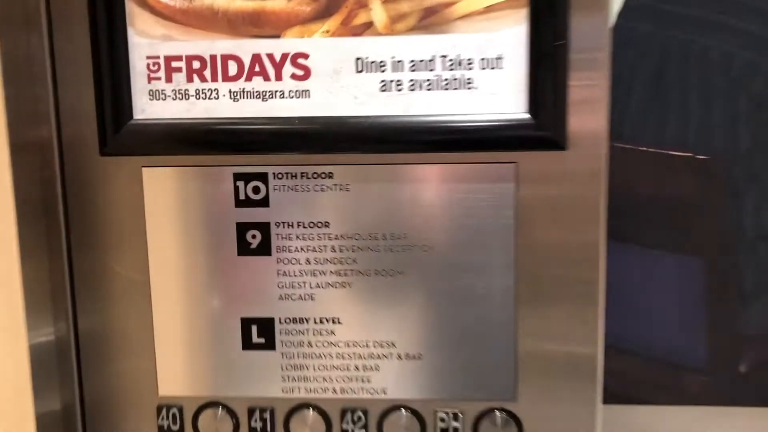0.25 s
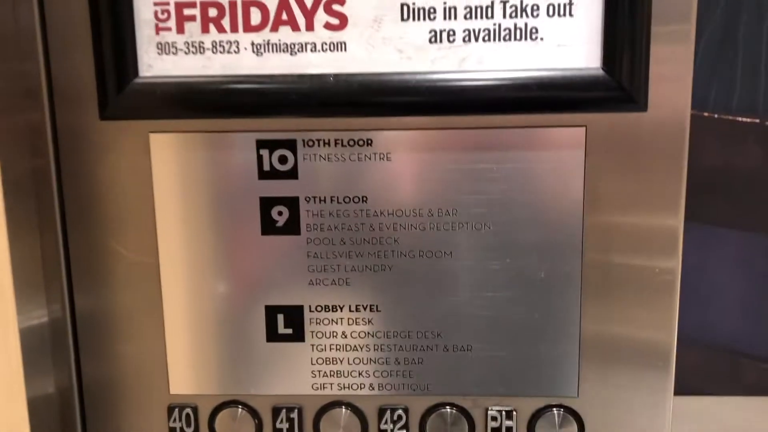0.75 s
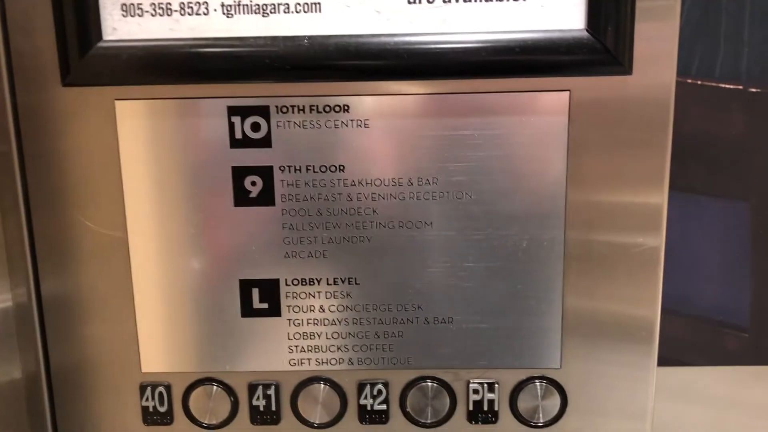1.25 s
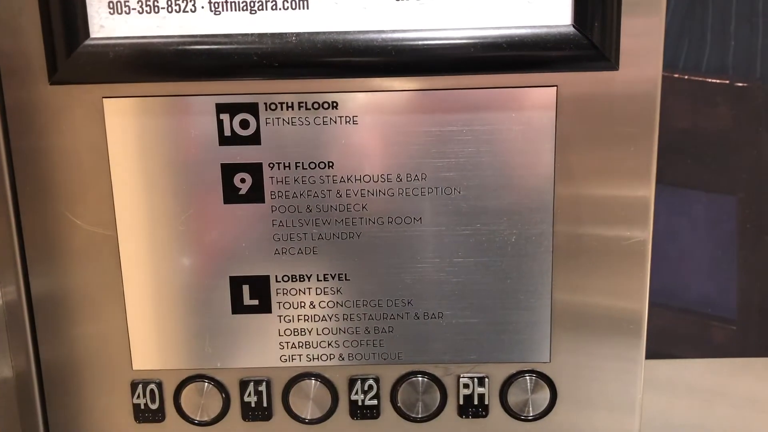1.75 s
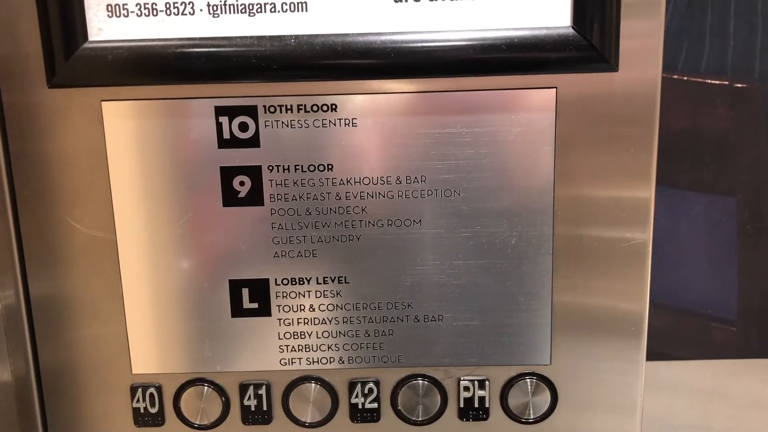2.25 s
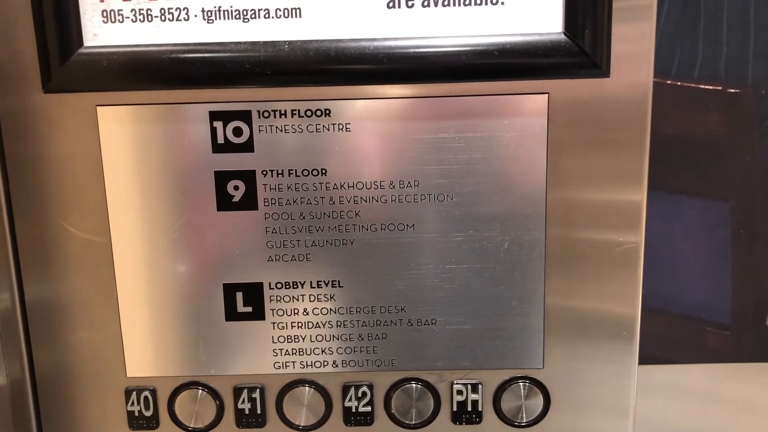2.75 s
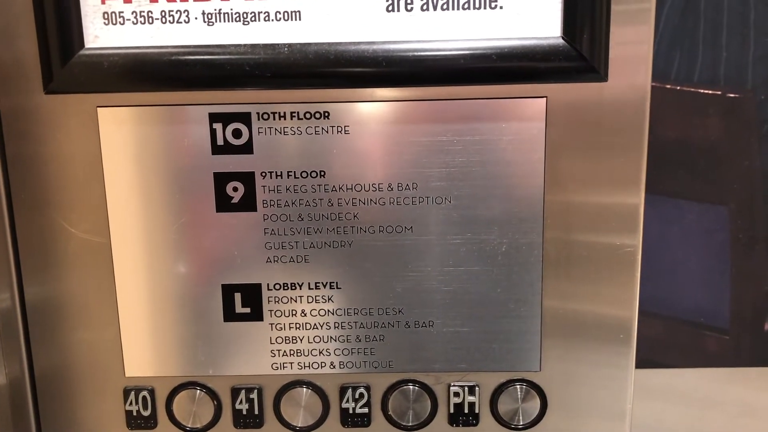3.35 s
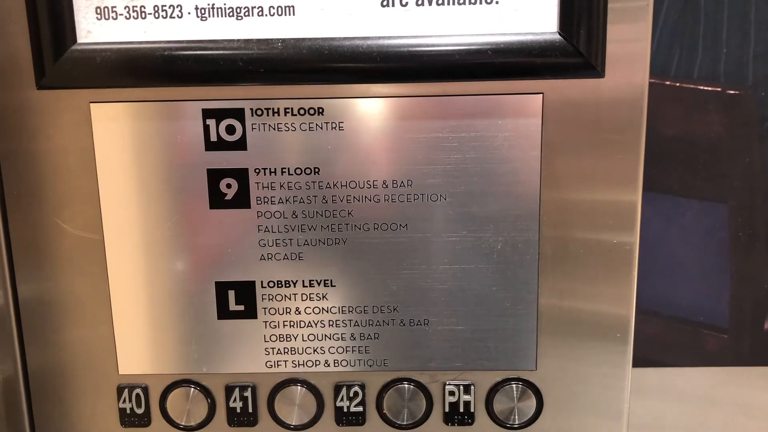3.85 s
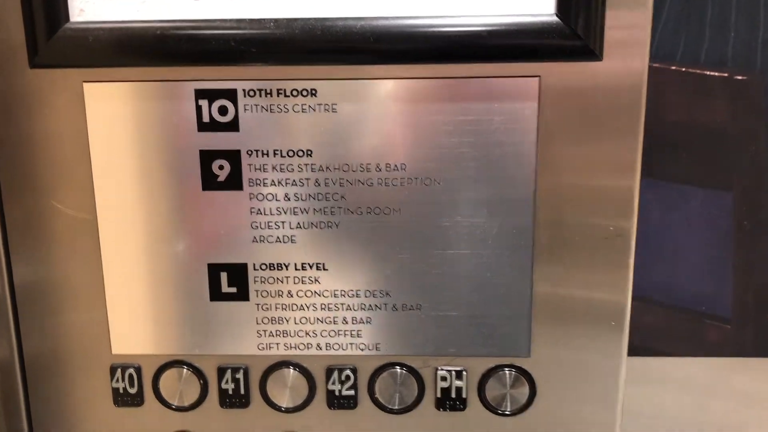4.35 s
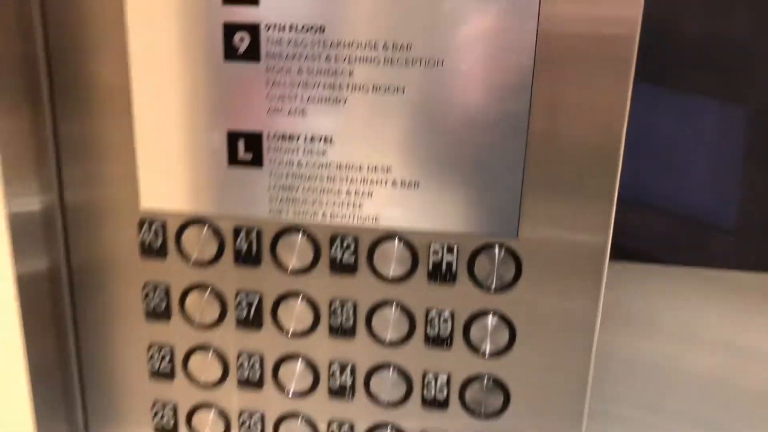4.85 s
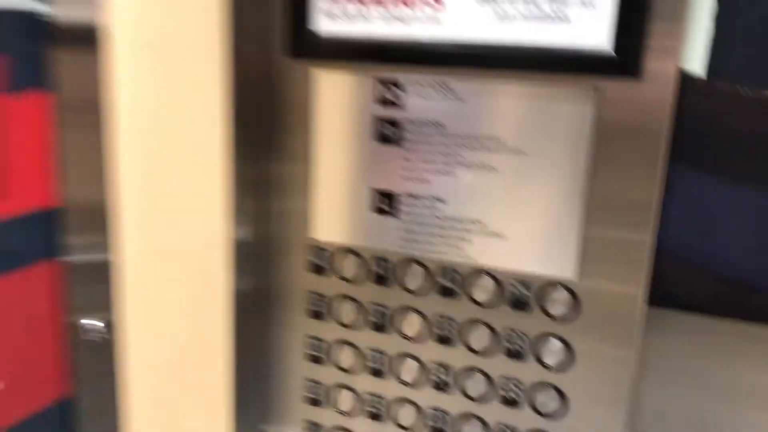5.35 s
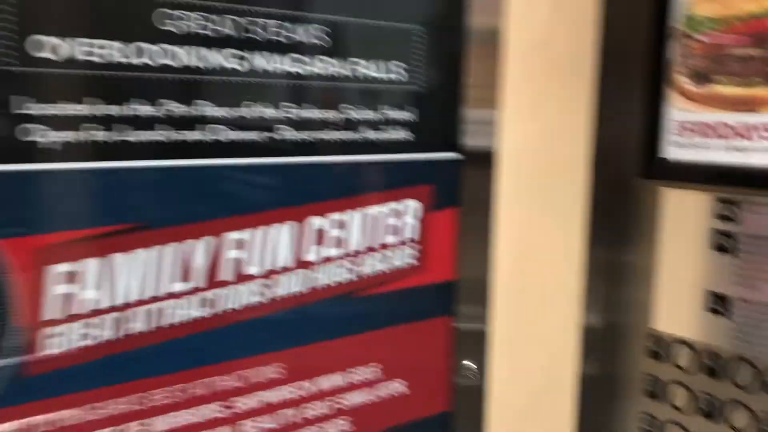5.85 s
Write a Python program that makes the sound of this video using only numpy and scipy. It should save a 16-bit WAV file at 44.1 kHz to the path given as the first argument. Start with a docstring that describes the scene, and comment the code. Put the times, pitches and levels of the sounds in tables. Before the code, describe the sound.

Inside a moving elevator cab, a steady low motor hum and uneven rumbling drone sit under soft fan air, with faint handling rustles and ticks.

```python
"""Travelling elevator cab.

A ceiling fan hums at twice the mains frequency (sine) and blows air (shaped noise, lifted at the cab's
standing waves). Low tones at multiples of a roller's turn rate, about four per second, and an uneven
drone (wavering sine) sound over panel rumble (noise). A hand shifting on the recorder adds faint treble
rustles (grainy noise strokes) and ticks (noise snaps with decaying modes)."""
import sys
import numpy as np
from scipy import signal
from scipy.fft import rfft, irfft
from scipy.io import wavfile
from scipy.ndimage import uniform_filter1d

SR = 44100
rng = np.random.default_rng(int(sys.argv[2]) if len(sys.argv) > 2 else 0)


def output_pcm(signal):
    """Save a mono or channel-first signal as 16-bit PCM at the path in sys.argv[1].

    Samples are clipped to [-1, 1] before scaling.
    """
    pcm = np.clip(np.atleast_2d(signal).T, -1, 1) * 32767
    wavfile.write(sys.argv[1], SR, np.round(pcm).astype(np.int16))


N = 268524

# panel rumble density before lifts and level changes: freq_hz, density_db_per_hz
RUMBLE_DENSITY = [(15, -100), (30, -83.5), (45, -69), (58, -60.5), (68, -61.5), (80, -57), (90, -61),
                  (99, -49), (108, -52), (118, -66), (134, -59), (150, -53.5), (162, -55.5), (170, -63.5),
                  (183, -60), (194, -64), (222, -64), (250, -68.5), (300, -68), (450, -92)]
# fan air density before lifts and level changes: freq_hz, density_db_per_hz
AIR_DENSITY = [(200, -80), (400, -76), (600, -80), (800, -81), (1200, -83), (1450, -86), (1900, -89.5),
               (2050, -92), (2600, -92), (3000, -94), (5000, -103), (7500, -108), (10000, -115),
               (13000, -121), (16000, -125)]
# cab standing waves: freq_hz, width_hz, lift_db
CAB_MODES = [(200, 12, 3.5), (237, 20, 6), (260, 12, 3.5), (277.4, 16, 5.5), (344.8, 31, 5.5),
             (367, 8.5, 1.5), (447, 16, 2), (500.7, 24.4, 7), (555.5, 30, 7), (636, 19, 5.5), (681, 21, 4),
             (894, 6, 6), (1671, 18, 7)]
# slow level changes of hum, rumble and air:
# time_s, hum_db_rms, rumble_db, air_db, air_treble_db, mode_pair_share (two modes near 500 Hz)
SLOW_LEVELS = [(0, -36.5, -3, 0.5, 0, 0.64), (.6, -33.5, -2, 0.5, -0.5, 1.1),
               (1.5, -34.5, -1, -1, -1.5, 1.05), (2.1, -36, -2, 0, -0.5, 1.7),
               (2.7, -32.5, 0.5, -0.5, -2.3, 1.5), (3.4, -36, -1, 0.2, -1.9, 1.2),
               (4, -34, -1.5, -0.55, -1.5, 1.06), (4.7, -33.5, -2, -1, -1.5, 1.3),
               (5.3, -34.5, -0.5, 0.4, -0.3, 0.25), (5.7, -37, -5.5, -0.8, -2, 1.3),
               (6.09, -38.5, -6.5, 1.5, 1, 0.45)]
# deepest rumble: time_s, gain_db
DEEP_GAIN = [(0, 2.5), (1.2, -7), (2, -1.5), (3.6, -4.5), (4.6, -5.5), (5.4, 0), (6.09, 8)]
# borders of the separately swelling rumble bands: freq_hz
SWELL_BORDERS_HZ = [130, 200, 260, 350]
# grip ticks: time_s, nominal_peak_db, centre_hz, spread_octaves
GRIP_TICKS = [(0.2992, -60, 11000, .6), (0.5816, -56, 8500, .3), (0.5874, -58, 13000, .35),
              (1.057, -57, 13500, .35), (2.2737, -63, 8200, .4), (2.2835, -64, 8000, .4),
              (2.3655, -64, 8500, .3), (2.378, -65, 8500, .4), (5.4226, -56, 7000, .35),
              (5.4231, -61, 13500, .3), (5.509, -61, 8000, .5), (5.5189, -58, 8500, .5),
              (5.6614, -58, 8500, .9), (5.672, -54, 9800, .7), (5.7543, -59, 9000, .9),
              (5.8137, -56, 7900, 0.11), (5.9294, -61, 14000, .4)]
# recorder case modes: freq_hz, relative_db
CASE_MODES = [(6500, 1), (7200, -2), (8000, 1), (8700, -2), (10200, 2), (12300, 0), (14800, -5)]
# rubs of skin or cloth: start_s, rise_s, hold_s, release_s, level_db, brightness (0-1, may be dulled at ends)
RUBS = [(.14, .015, 0.05, .04, -73, .7), (0.293, 0.012, 0.036, 0.055, -60, 0.7),
        (0.33, 0.028, 0.02, 0.09, -57, 0.06), (1.098, 0.037, .03, .06, -61, 0),
        (2.225, .04, .19, .06, -84, .9), (2.272, .008, .03, .04, -74, 1),
        (2.37, .008, 0.031, 0.05, -75, 0.9), (2.76, 0.0073, .012, .02, -74, .5),
        (3.93, .02, .03, .04, -72, .5), (4.796, .01, 0.037, .03, -70, 0.3),
        (5.04, 0.011, 0.0076, .025, -66, .5), (5.3, 0.057, 0.44, 0.12, -74, 0.2),
        (5.404, .015, 0.1, .03, -68, 0.5), (5.542, .01, .02, .02, -80, 0.6),
        (5.741, 0.016, .008, 0.03, -59, 0.1), (5.81, .006, .015, 0.04, -72, .4),
        (5.836, 0.044, 0.095, 0.07, -65, 0.36), (5.905, 0.01, 0.035, 0.044, -64, 0),
        (5.973, .005, .01, .03, -69, 0)]
# colour of a slow, dull rub: freq_hz, relative_db_per_hz
DULL_COLOUR = [(1000, -23), (2000, 5), (2800, 0.5), (3600, -1), (4500, -5.5), (6000, -13.5), (10000, -23.5),
               (17000, -36)]
# colour of a quick, bright rub: freq_hz, relative_db_per_hz
BRIGHT_COLOUR = [(2000, -33), (4100, -1), (4900, -3), (5900, -4.5), (7300, 0), (9000, -5), (12500, -10.5),
                 (17000, -18)]
# the one firm rub that also sounds a hollow of the grip: start_s, rise_s, hold_s, release_s, level_db
HOLLOW_RUB = (.305, .022, .035, .04, -60)
# uneven low drone near 180 Hz: time_s, level_db_rms
DRONE_LEVEL = [(0.0, -46), (0.66, -39), (0.73, -51), (0.86, -33), (1.15, -48.5), (1.24, -33.5), (1.29, -46),
               (1.54, -39), (2.19, -48.5), (3.1, -39.5), (3.37, -57), (3.51, -36), (3.98, -60),
               (4.04, -38.5), (4.48, -48), (4.71, -35), (4.76, -41.5), (6.09, -59)]
# two loudest roller orders, before flutter: time_s, order_24_db_rms, order_26_db_rms
LOUD_ORDER_LEVELS = [(0.0, -41.5, -41), (0.36, -35.5, -48), (0.44, -41, -38), (1.61, -44, -44.5),
                     (2.41, -40, -31.5), (3.59, -34, -43), (3.9, -44, -33), (4.16, -31, -47),
                     (5.09, -39, -47), (5.19, -39, -53), (5.49, -44, -45), (5.56, -41, -50),
                     (5.68, -32, -29.5), (5.77, -43.5, -69), (5.97, -36.5, -41), (6.09, -43, -70)]

DEEP_HZ, TREBLE_HZ = 87, 3600  # split points of rumble and air
SWELL_DB, GUST_DB, RIPPLE_DB = 1.3, 0.45, 1.2  # rms
TICK_T60_S, RING_GAIN = 0.022, 0.49
GRIT_PER_S, GRIT_SHARE = 2500, 0.45  # separate catches of skin or fibre
GRAIN_DB, RAGGED_DB = 1.4, 1  # rms unevenness; ragged = stick and slip
EDGE_DROP_DB, DULLING = 22.5, 0.47  # level lost at both stroke ends, brightness lost after the rise
HOLLOW_HZ, HOLLOW_WIDTH_HZ = 4900, 1100
HUM_HZ, ROLLER_HZ = 119.88, 4.159
DRONE_HZ, DRONE_WAVER_HZ = 180.1, 4
FIRST_ORDER, LAST_ORDER, LOUD_ORDER_NUMBERS = 6, 47, (24, 26)
ORDER_LIFT_DB, ORDER_SCATTER_DB, ORDER_DRIFT_DB = 2.5, 2, 3.64
ORDERS_FOLLOW = 0.51  # share of the slow rumble changes followed by weak orders above DEEP_HZ
FLUTTER_DB = 1.5  # rms, loud orders
BAND_LIMIT_HZ = 15740


def gain_of(db):
    """Decibels to amplitude."""
    return 10 ** (np.asarray(db) / 20)


def evened(x):
    """Scales to rms 1."""
    return x / np.sqrt(np.mean(x ** 2) + 1e-20)


def along(rows):
    """Columns of a time table interpolated to every sample."""
    time_s, *columns = np.transpose(rows)
    return [np.interp(np.arange(N) / SR, time_s, c) for c in columns]


def coloured(x, points, lift_db=0):
    """Gives unit white noise a tabled density plus a lift."""
    hz = np.fft.rfftfreq(N, 1 / SR)
    f_hz, db = np.transpose(points)
    shape_db = np.interp(np.log(hz + 1), np.log(f_hz + 1), db, left=-160, right=-160)
    return irfft(rfft(x) * gain_of(shape_db + lift_db) * np.sqrt(SR / 2), N)


def wander(top_hz, low_hz=0.083):
    """Random drift of about rms 1: twelve sines, weaker as they get faster."""
    t = np.arange(0, N + 500, 500) / SR
    rates_hz = np.geomspace(low_hz, top_hz, num=12)
    drift = sum(np.sin(2 * np.pi * (f * t + rng.random())) / np.sqrt(f) for f in rates_hz)
    return np.interp(np.arange(N) / SR, t, evened(drift))


def tone(hz, db_rms, slip_cycles=0):
    """Sine with random start phase and optional phase slip."""
    cycles = hz * np.arange(N) / SR + rng.random() + slip_cycles
    return np.sqrt(2) * gain_of(db_rms) * np.sin(2 * np.pi * cycles)


def mode_lifts_db():
    """Resonance curve of each cab standing wave."""
    hz = np.fft.rfftfreq(N, 1 / SR)
    return [db / (1 + (2 * (hz - f) / width) ** 2) for f, width, db in CAB_MODES]


def panel_rumble(lift_db):
    """Low panel noise; the deepest part has its own level, bands above swell separately."""
    hz = np.fft.rfftfreq(N, 1 / SR)
    rumble = coloured(rng.standard_normal(N), RUMBLE_DENSITY, lift_db)
    deep = irfft(rfft(rumble) / (1 + (hz / DEEP_HZ) ** 8), N)
    spectrum = rfft(rumble - deep)
    band = np.digitize(hz, SWELL_BORDERS_HZ)
    upper = np.zeros(N)
    for k in range(len(SWELL_BORDERS_HZ) + 1):
        upper += irfft(spectrum * (band == k), N) * gain_of(SWELL_DB * wander(9, 1.6))
    return deep * gain_of(along(DEEP_GAIN)[0]) + upper * gain_of(along(SLOW_LEVELS)[1])


def fan_rush(lifts, lift_db):
    """Turbulent air noise; body, treble and the mode pair near 500 Hz change level separately."""
    _, _, air_db, treble_db, pair_share = along(SLOW_LEVELS)
    hz = np.fft.rfftfreq(N, 1 / SR)
    gust = rng.standard_normal(N)
    plain = coloured(gust, AIR_DENSITY, lift_db - lifts[7] - lifts[8])  # without the pair
    rush = plain + pair_share * (coloured(gust, AIR_DENSITY, lift_db) - plain)
    body = irfft(rfft(rush) / (1 + (hz / TREBLE_HZ) ** 4), N)
    levelled = body * gain_of(air_db) + (rush - body) * gain_of(treble_db)
    return levelled * gain_of(GUST_DB * wander(14, 0.704))


def airflow():
    """Panel rumble and fan rush, both lifted by the cab's standing waves."""
    hz = np.fft.rfftfreq(N, 1 / SR)
    lifts = mode_lifts_db()
    # higher up the modes crowd into a fine fixed ripple
    ripple = evened(uniform_filter1d(rng.standard_normal(len(hz)), 200))
    lift_db = sum(lifts) + RIPPLE_DB * ripple * (hz > 1800)
    return panel_rumble(lift_db) + fan_rush(lifts, lift_db)


def ticks():
    """Thin noise snaps plus the case modes around each centre, decaying together."""
    out, t = np.zeros(N), np.arange(1500) / SR
    modes = np.array([gain_of(db) * np.sin(2 * np.pi * hz * t) for hz, db in CASE_MODES])
    mode_hz = np.transpose(CASE_MODES)[0]
    for time_s, db, centre_hz, spread in GRIP_TICKS:
        edges_hz = centre_hz * 2. ** np.array([-spread - .05, spread + .05])
        band = signal.butter(4, np.clip(edges_hz, 1000, 20000), "band", fs=SR, output="sos")
        snap = evened(signal.sosfilt(band, rng.standard_normal(len(t))))
        share = np.exp(-(np.log2(mode_hz / centre_hz) / spread) ** 2)
        share *= rng.uniform(0.51, 1, len(CASE_MODES))
        decay = gain_of(db - 60 * t / TICK_T60_S)
        out[round(time_s * SR):][:len(t)] += (snap / 2 + RING_GAIN * share @ modes) * decay
    return out


def friction_grains():
    """Two uneven noises with sparse random catches, as of skin or fibre."""
    noise = rng.standard_normal((2, N))
    uneven = evened(uniform_filter1d(rng.standard_normal((2, N)), 120))
    grains = noise * gain_of(GRAIN_DB * uneven)
    catches = rng.exponential(1, N) * rng.choice([-1, 1], N) * (rng.random(N) < GRIT_PER_S / SR)
    return evened(grains) + GRIT_SHARE * evened(catches)


def hollow_scuff(grain):
    """A hollow of the grip resonates under the firm rub: two peak filters in series."""
    *stroke, level_db = HOLLOW_RUB
    wide = signal.lfilter(*signal.iirpeak(HOLLOW_HZ, 2, SR), grain[::-1])  # reversed: decorrelated
    narrow = signal.iirpeak(HOLLOW_HZ, HOLLOW_HZ / HOLLOW_WIDTH_HZ, SR)
    scuff = evened(signal.lfilter(*narrow, wide))
    slack = np.interp(np.arange(N) / SR, np.cumsum(stroke), [1, 0, 0, 1])
    return gain_of(level_db - EDGE_DROP_DB * slack) * (slack < 1) * scuff


def rustles():
    """Friction grains under each stroke, mixed dull to bright as a slow or quick rub."""
    grains = friction_grains()
    dull = evened(coloured(grains[0], DULL_COLOUR))
    bright = evened(coloured(grains[1], BRIGHT_COLOUR))
    out = hollow_scuff(grains[1])
    for start, rise, hold, release, db, brightness in RUBS:
        end = start + rise + hold + release
        at = np.arange(round(start * SR), min(round(end * SR), N))
        slack = np.interp(at / SR - start, np.cumsum([0, rise, hold, release]), [1, 0, 0, 1])
        fading = slack * (at / SR > start + rise)
        shine = np.clip(brightness - DULLING * fading, 0, 1)
        mix = np.sqrt(1 - shine) * dull[at] + np.sqrt(shine) * bright[at]
        out[at] += gain_of(db - EDGE_DROP_DB * slack) * mix
    return out * gain_of(RAGGED_DB * evened(uniform_filter1d(rng.standard_normal(N), 400)))


def fan_hum():
    """Motor hum at twice the mains frequency: one steady-pitched sine."""
    return tone(HUM_HZ, along(SLOW_LEVELS)[0])


def low_drone():
    """Uneven low drone: a sine surging in level and wavering in pitch."""
    slip_cycles = np.cumsum(DRONE_WAVER_HZ * wander(15, 1.5)) / SR
    return tone(DRONE_HZ, along(DRONE_LEVEL)[0], slip_cycles)


def roller_orders():
    """Low tones at multiples of the roller's turn rate, two of them loud."""
    out = np.zeros(N)
    for order, db in zip(LOUD_ORDER_NUMBERS, along(LOUD_ORDER_LEVELS)):
        out += tone(order * ROLLER_HZ, db + FLUTTER_DB * wander(6, 0.803), 0.089 * wander(4, 0.603))
    f_hz, density_db = np.transpose(RUMBLE_DENSITY)
    rumble_db = along(SLOW_LEVELS)[1]
    for order in set(range(FIRST_ORDER, LAST_ORDER + 1)) - set(LOUD_ORDER_NUMBERS):
        hz = order * ROLLER_HZ
        # weaker orders: rumble level at their pitch, lifted and scattered
        db = np.interp(np.log(hz), np.log(f_hz), density_db) + ORDER_LIFT_DB
        db += ORDER_SCATTER_DB * rng.standard_normal()
        db += ORDERS_FOLLOW * rumble_db * (hz > DEEP_HZ)
        # each weak low tone drifts randomly on its own
        out += tone(hz, db + ORDER_DRIFT_DB * wander(0.47), 0.12 * wander(0.325))
    return out


def scene():
    """All sources summed at one microphone."""
    return (airflow() + ticks() + rustles() + fan_hum() + low_drone() + roller_orders())[None]


def record(dry):
    """Band limit of the recorder: steep low-pass FIR."""
    low_pass = signal.firwin(2047, BAND_LIMIT_HZ, window=("kaiser", 9), fs=SR)
    return signal.oaconvolve(dry, low_pass[None], "same")


dry = scene()
out = record(dry)
output_pcm(out)
```